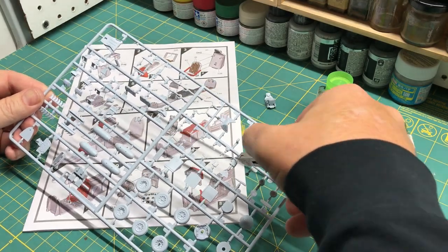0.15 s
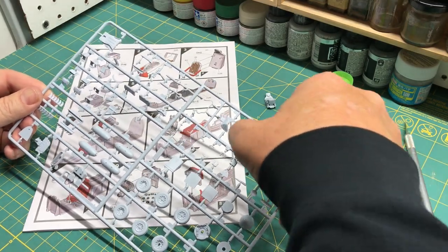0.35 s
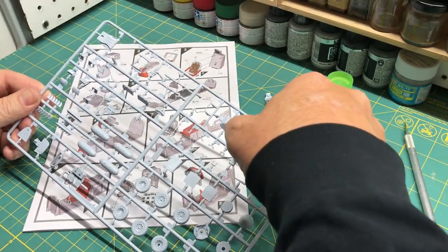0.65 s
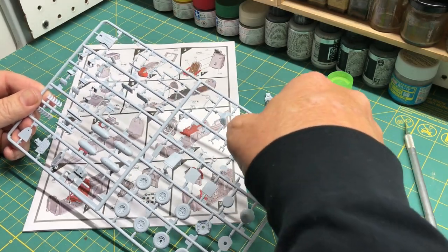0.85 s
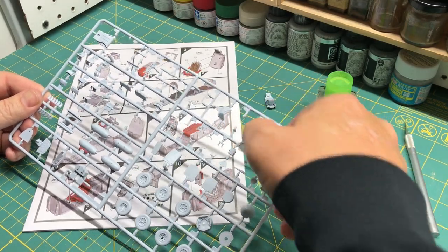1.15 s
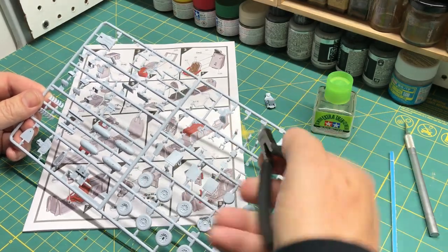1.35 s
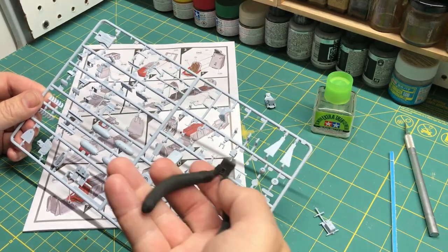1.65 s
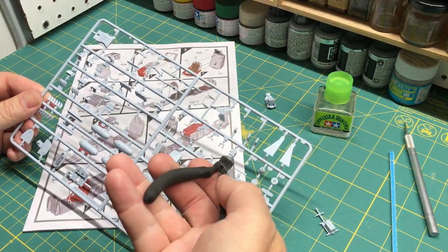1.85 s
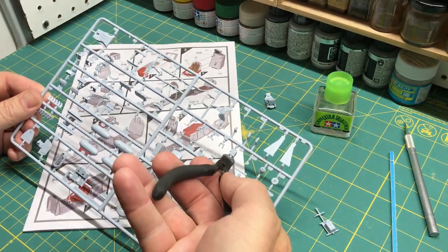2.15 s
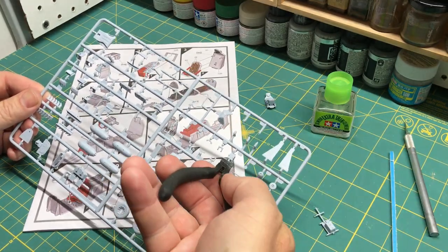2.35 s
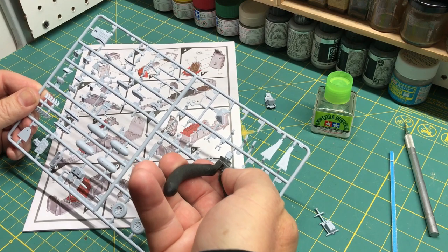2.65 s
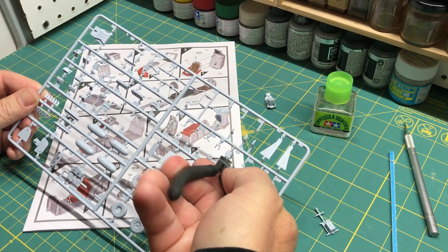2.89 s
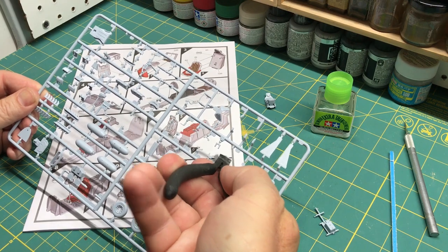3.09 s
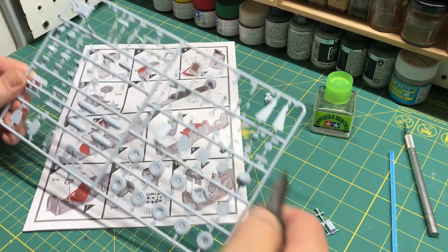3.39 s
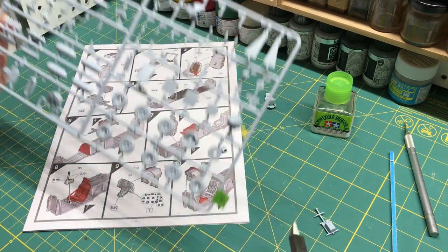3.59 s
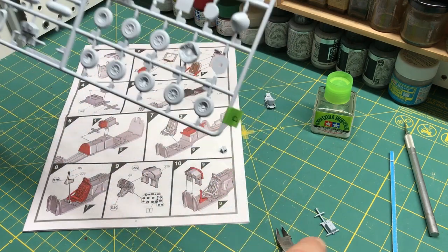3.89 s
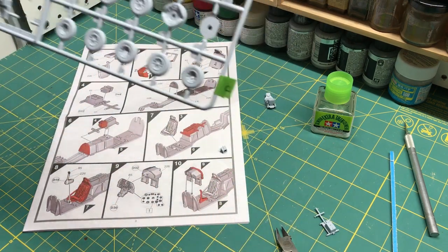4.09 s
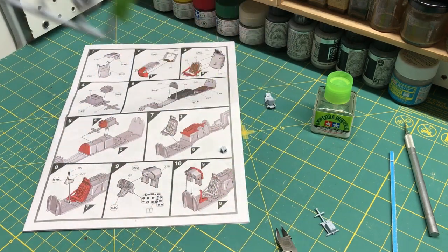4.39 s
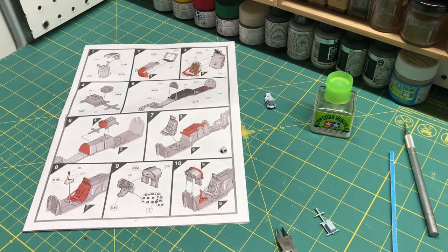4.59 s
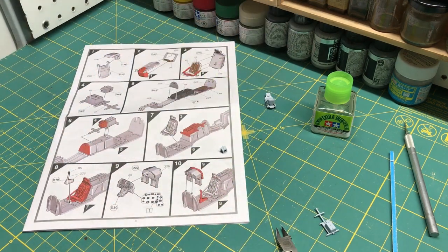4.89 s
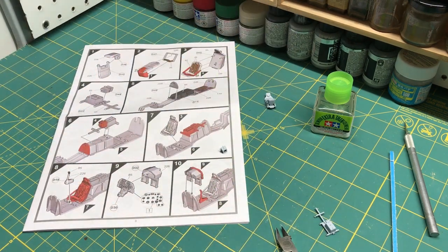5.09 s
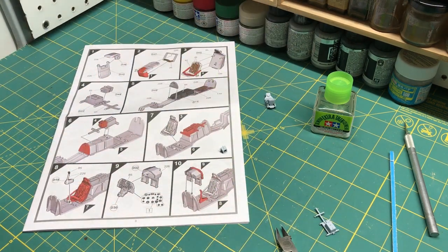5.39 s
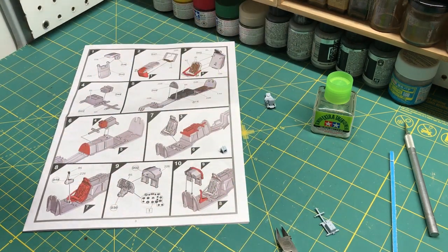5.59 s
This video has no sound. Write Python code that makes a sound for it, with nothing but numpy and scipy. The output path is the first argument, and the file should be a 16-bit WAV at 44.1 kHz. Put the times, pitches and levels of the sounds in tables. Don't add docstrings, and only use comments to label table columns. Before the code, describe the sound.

A quiet indoor hobby desk, heard close with short, dry room reflections. Throughout, a very low hum near 58 Hz swells and sinks every 2.5 seconds, weakest around 1.7 and 4.2, under soft air noise and a deep room boom. A faint slide opens. At 0.85 cutters snap plastic with a bright, ringing crack. Small taps at 1.25 lead into soft sleeve and finger rustles until 1.8, with tiny ticks near 1.9 and 2.2 and a light scrape at 2.4. A second sharp snip comes at 3.0, a duller one at 3.1, then a flurry of clicks and rubbing until 3.4. From 3.65 the tool touches down and scrapes; at 3.92 it lands with a hard, loud double knock, woody and briefly ringing, with tiny bounces until 4.0. Faint ticks follow at 4.4, 4.8 and 5.1, then soft brushes and clicks around 5.25-5.45. Treble occasionally drops out momentarily with faint watery tones.

```python
import sys
import numpy as np
from scipy import signal
from scipy.fft import rfft, irfft
from scipy.io import wavfile
from scipy.ndimage import uniform_filter1d

SR = 44100
rng = np.random.default_rng(int(sys.argv[2]) if len(sys.argv) > 2 else 0)


def file_out(sig):
    cols = np.atleast_2d(sig).T
    lim = np.clip(cols, -1, 1)
    pcm = np.round(lim * 32767).astype(np.int16)
    wavfile.write(sys.argv[1], SR, pcm)


def magnitude_from_level(level_db):
    exponent = np.asarray(level_db, float) / 20
    return 10 ** exponent


N = 253134


def read(points, hz):
    f, value = np.transpose(points)
    return np.interp(np.log(hz + 1), np.log(f + 1), value)


def evened(x):
    return x / np.sqrt(np.mean(x ** 2) + 1e-20)


def peaked(x):
    return x / np.max(abs(x))


def add(mix, s, sound):
    part = mix[round(s * SR):][:len(sound)]
    part += sound[:len(part)]


def coloured(x, spectrum):
    hz = np.fft.rfftfreq(len(x), 1 / SR)
    shaped = rfft(x) * magnitude_from_level(read(spectrum, hz)) * (hz < spectrum[-1][0])
    return evened(irfft(shaped, len(x)))


def resonate(x, hz, width):
    turn = np.exp(2j * np.pi * np.cumsum(hz * np.ones(len(x))) / SR)
    r = np.exp(-np.pi * width / SR)
    return 2 * (turn * signal.lfilter([1 - r], [1, -r], x / turn)).real


def highpass(order, hz):
    return signal.butter(N=order, Wn=hz, btype="high", fs=SR, output="sos")


def crack(t60, rise_s, low_hz):
    t = np.arange(4000) / SR
    rise = (1 - np.exp(-t / rise_s)) ** 2
    burst = rng.standard_normal(len(t)) * rise * magnitude_from_level(-60 * t / t60)
    return signal.sosfilt(highpass(2, low_hz), burst)


# frequency in Hz, level in dB per Hz.
ROOM_AIR = [(22, -40), (33, -25.5), (44, -12.5), (65, -4), (87, -11), (131, -14), (190, -22.5),
            (350, -28.5), (1150, -44.5), (3000, -49.5), (8000, -53.5), (16500, -51)]
AIR_DB = -55
HUM_HZ, HUM_DB = 58.52, -49
BEAT_S, CANCEL_S, LEFT_OVER = 2.5, 1.69, 0.09
BOOM_HZ, BOOM_WIDTH_HZ, BOOM_DB = 52.9, 3, -57


def room_tone():
    t = np.arange(N) / SR
    beat = np.pi * (t - CANCEL_S) / BEAT_S
    turn = 2 * np.pi * HUM_HZ * t
    tones = np.sin(beat) * np.sin(turn) + LEFT_OVER * np.cos(beat) * np.cos(turn)
    hum = np.sqrt(2) * magnitude_from_level(HUM_DB) * tones
    no_hum = [(f, level - 4.8 * (45 < f < 72)) for f, level in ROOM_AIR]
    air = magnitude_from_level(AIR_DB) * coloured(rng.standard_normal(N), no_hum)
    boom = resonate(rng.standard_normal(N), BOOM_HZ, BOOM_WIDTH_HZ)
    boom = resonate(boom, BOOM_HZ, 3 * BOOM_WIDTH_HZ)
    return hum + air + magnitude_from_level(BOOM_DB) * evened(boom)


# frequency in Hz, 60 dB decay time in seconds.
WALL_DECAY = [(300, 0.21), (1500, 0.14), (6000, 0.1), (15000, .09)]


def walls(x):
    hz, t, z = signal.stft(rng.standard_normal(SR // 2), SR, nperseg=128)
    decay = magnitude_from_level(-60 * t / read(WALL_DECAY, hz)[:, None])
    tail = signal.istft(z * decay, SR, nperseg=128)[1]
    tail *= np.arange(len(tail)) > .002 * SR
    return signal.fftconvolve(x, tail / np.linalg.norm(tail))[:N]


# frequency in Hz, level in dB per Hz.
CLOTH_HISS = [(1200, -20), (2200, -3.5), (4000, -2.5), (8000, -2), (14000, -1.5), (16500, 2.5)]
# frequency in Hz, level in dB per Hz.
SKIN_SCRAPE = [(250, -28.5), (500, -2), (1000, -4), (2000, -11), (4000, -22)]


def rub_noises():
    uneven = rng.standard_normal(N) * magnitude_from_level(1.2 * rng.exponential(1, N))
    hz, t, z = signal.stft(uneven, SR, nperseg=256)
    patches = uniform_filter1d(rng.standard_normal(z.shape), size=3, axis=0)
    patches = evened(uniform_filter1d(patches, size=9, axis=1))
    streaky = signal.istft(z * magnitude_from_level(3.6 * patches), SR, nperseg=256)[1][:N]
    catches = (rng.random(N) < 4000 / SR) * rng.standard_normal(N)
    return coloured(streaky, CLOTH_HISS), coloured(catches, SKIN_SCRAPE)


def rub(noises, s, u, hiss_db, scrape_db, ring_hz, share):
    at = round(s * SR) + np.arange(len(u))
    fine, coarse = [noise[at] for noise in noises]
    ring = resonate(coarse, ring_hz, 160) + .4 * resonate(fine, 2.4 * ring_hz, 300)
    scrape = share * evened(ring) + (1 - share) * coarse
    return (magnitude_from_level(hiss_db) * fine + magnitude_from_level(scrape_db) * scrape) * signal.windows.tukey(len(at), .08)


# middle in seconds, length in seconds, hiss in dB, scrape in dB, scrape ring in Hz.
BRUSHES = [(0.95, 0.078, -82, -68, 700), (1.426, .18, -73, -80, 750), (1.578, 0.19, -71.5, -84, 820),
           (1.747, 0.11, -75, -81, 700), (3.176, .035, -66, -72, 700), (3.235, .055, -72, -65, 696),
           (3.309, 0.094, -75, -66.5, 1010), (3.405, .14, -69.5, -75.5, 1040),
           (3.556, 0.13, -73.5, -80, 800), (3.726, 0.12, -75, -65.5, 1170), (2.428, 0.094, -84, -69.5, 597),
           (.2, 0.18, -90, -73, 1340), (1.256, 0.065, -85, -76, 690), (3.84, 0.081, -70, -67, 1390),
           (5.247, 0.19, -68, -78.5, 843), (5.385, 0.12, -69, -77.5, 836)]
BRUSH_EDGE_DB, BRUSH_RING = -13, 0.3


def brushes(noises):
    out = np.zeros(N)
    for middle, length, hiss_db, scrape_db, ring_hz in BRUSHES:
        s = middle - length / 2
        u = np.linspace(0, 1, round(length * SR))
        swell = magnitude_from_level(BRUSH_EDGE_DB * (2 * u - 1) ** 2)
        add(out, s, swell * rub(noises, s, u, hiss_db, scrape_db, ring_hz, BRUSH_RING))
    return out


# start in seconds, length in seconds, hiss in dB, scrape in dB, scrape ring in Hz.
SLIDES = [(0, 0.16, -93, -61.5, 1330), (.89, .04, -79, -76, 690), (2.374, 0.13, -85, -60, 675),
          (3.13, 0.021, -72, -76, 750), (3.185, .02, -69, -60, 700), (3.659, 0.084, -61, -50, 1050),
          (3.74, .03, -64, -52, 1210), (3.754, .095, -60, -51, 1340), (3.856, .062, -60, -54.5, 800),
          (4.0, 0.16, -85, -64.5, 880), (5.086, .062, -65, -73, 970)]
SLIDE_RISE_S, HISS_FADE_DB, SCRAPE_FADE_DB, SLIDE_RING = .004, -6, -14, .5


def slides(noises):
    out = np.zeros(N)
    for s, length, hiss_db, scrape_db, ring_hz in SLIDES:
        u = np.linspace(0, 1, round(length * SR))
        rise = np.minimum(u * length / SLIDE_RISE_S, 1)
        hiss_db = hiss_db + HISS_FADE_DB * u
        scrape_db = scrape_db + SCRAPE_FADE_DB * np.sqrt(u)
        add(out, s, rise * rub(noises, s, u, hiss_db, scrape_db, ring_hz, SLIDE_RING))
    return out


# start in seconds, peak in dB, mode in Hz, 60 dB decay time in seconds.
TAPS = [(.85, -53.5, 355, 0.21), (1.232, -56.5, 1590, 0.073), (1.238, -57.5, 1010, 0.038),
        (1.246, -57, 650, 0.17), (2.212, -63, 900, 0.034), (2.387, -52, 674, 0.037),
        (2.403, -53.5, 1020, 0.06), (3.012, -52, 595, 0.072), (3.186, -52, 677, 0.022),
        (3.278, -74, 1580, .12), (3.319, -56, 1530, 0.074), (3.51, -61.5, 1190, 0.058),
        (3.69, -60, 2220, .1), (3.78, -54, 3600, .08), (3.9323, -30, 3220, 0.019),
        (3.942, -43, 5430, 0.079), (4.794, -51, 5250, .04), (5.44, -58, 1880, 0.053),
        (5.452, -61, 3520, 0.057)]


def taps():
    out = np.zeros(N)
    for s, db, hz, t60 in TAPS:
        width = 120 + hz / 8
        ring = resonate(crack(t60, .0008, 300), hz, width)
        add(out, s, magnitude_from_level(db) * peaked(resonate(ring, hz, 2 * width)))
    return out


# start in seconds, peak in dB, ring in Hz, ring share from 0 to 1, 60 dB decay time in seconds.
TICKS = [(1.2395, -53, 2550, 0.43, 0.053), (1.8878, -57, 4060, 0.6, 0.025), (1.962, -64, 2500, 0.9, 0.025),
         (2.208, -63, 2990, 0.7, 0.025), (3.1624, -58, 3620, 0.8, 0.025), (3.171, -50, 4240, 0.6, 0.018),
         (3.1836, -43, 4100, 1, 0.014), (3.2208, -48, 4200, 0.5, 0.0069), (3.237, -44, 3900, 0.55, 0.0057),
         (3.25, -56, 3020, 0.7, 0.016), (3.275, -56, 2610, 0.3, 0.028), (3.309, -53, 3280, 0.7, 0.012),
         (3.316, -56, 3500, 0.55, 0.035), (3.366, -59, 3320, 0.47, 0.025), (3.5343, -68, 2880, 0, 0.019),
         (4.417, -63.5, 2830, 0.6, 0.054), (4.792, -53.5, 5200, 0.95, 0.03),
         (5.0872, -52, 6580, 0.2, 0.039), (5.1294, -61.5, 2820, 0.4, 0.03),
         (5.38, -54.5, 3110, 0.26, 0.025), (5.439, -47, 4530, 0.37, 0.028), (5.4463, -47, 3780, 0.3, 0.026)]


def ticks():
    out = np.zeros(N)
    for s, db, hz, share, t60 in TICKS:
        burst = crack(t60, 0.00088, 1450)
        share = np.clip(share, 0, 1)
        tick = share * evened(resonate(burst, hz, 820)) + (1 - share) * evened(burst)
        add(out, s - .0005, magnitude_from_level(db) * peaked(tick))
    return out


# start in seconds, peak in dB, tick in dB, hardness in Hz, ring length as a factor.
KNOCKS = [
    (3.6552, -38.5, -48, 2500, 0.53),
    (3.7422, -45, -53.5, 2500, 0.43),
    (3.851, -24, -35, 1300, 0.93),
    (3.9215, -7, -25, 1800, 0.66),
    (3.9335, -8, -22.5, 1800, 0.38),
    (3.9446, -22, -47, 800, 0.29),
    (3.9542, -23.5, -42, 2200, 0.21),
    (3.9745, -21.5, -34.5, 1800, 0.53),
]
# frequency in Hz, level in dB, 60 dB decay time in seconds.
DESK_MODES = [(110, -12.5, 0.13), (181.5, -15.5, 0.12), (233, -11, .18), (300, -2.5, 0.071),
              (340, -9.5, 0.053), (391.7, -2, 0.13), (508, -15.5, .08), (636, -11.5, .07),
              (672, -2.5, 0.046), (784, -4.5, 0.044), (933, -4, 0.054), (1097, -10.5, .04),
              (1185, -5.5, 0.038), (1340, -5.5, 0.018), (1608, -7.5, 0.033), (1930, -15.5, 0.049),
              (2400, -21.5, 0.0427)]


def knocks():
    out = np.zeros(N)
    t = np.arange(9000) / SR
    spots = rng.standard_normal((len(KNOCKS), len(DESK_MODES)))
    for (s, db, tick_db, hard_hz, ring), spot in zip(KNOCKS, spots):
        modes = np.zeros(len(t))
        for (hz, level, t60), chance in zip(DESK_MODES, spot):
            late = t - .002 * np.sqrt(1000 / hz)
            decay = magnitude_from_level(level + 2.4 * chance - 60 * t / (ring * t60))
            softness = 1 + (hz / hard_hz) ** 2
            rise = 1 - np.exp(-(t * hz / .8) ** 2)
            modes -= decay / softness * rise * np.cos(2 * np.pi * hz * late)
        add(out, s, magnitude_from_level(db) * peaked(modes))
        add(out, s, magnitude_from_level(tick_db) * peaked(crack(0.042, .0002, 1500)))
    return out


# start in seconds, peak in dB, body knock in dB,
# knock in Hz, 60 dB decay time in seconds.
SNAPS = [
    (0.8478, -18.5, -54, 785, 0.023),
    (3.0066, -22.5, -49, 1040, 0.017),
    (3.1083, -30.5, -38.5, 626, .012),
]
# frequency in Hz, width in Hz, level in dB.
SNAP_RINGS = [
    [(3520, 44, -1), (5000, 45, -5), (7300, 120, -21), (8000, 31, 8), (9550, 190, 9), (11400, 33, -7),
     (12960, 220, 5.5), (16100, 150, -11)],
    [(3050, 98, -17), (3190, 100, -8), (4700, 99, 4), (5470, 140, 0), (7700, 120, -11), (8730, 93, -19),
     (14100, 230, 4.5), (15700, 240, -14)],
    [(1850, 140, -7.5), (3960, 100, 22.5), (4520, 110, 3), (5370, 88, -60), (6820, 110, -45),
     (13300, 250, -18), (14000, 80, -12.5)],
]


def snaps():
    out = np.zeros(N)
    damping, bare = 5.5, .5
    for (s, db, knock_db, knock_hz, t60), rings in zip(SNAPS, SNAP_RINGS):
        burst = crack(t60, 0.00033, 1900)
        ring = sum(magnitude_from_level(level) * evened(resonate(burst, hz, damping * width)) for hz, width, level in rings)
        snap = evened(ring) + bare * evened(burst)
        knock = resonate(crack(0.036, 0.003, 130), knock_hz, 370)
        knock = resonate(knock, knock_hz, 760)
        add(out, s - .0004, magnitude_from_level(db) * peaked(snap) + magnitude_from_level(knock_db) * peaked(knock))
    return out


def scene():
    bright = snaps() + ticks()
    dull = knocks() + taps()
    reflections = magnitude_from_level(-13) * walls(bright) + magnitude_from_level(-12.5) * walls(dull)
    noises = rub_noises()
    rubs = slides(noises) + brushes(noises)
    return (bright + dull + reflections + rubs + room_tone())[None]


# centre in seconds, empty above this Hz, two stray tones
# in Hz.
DROPOUTS = [(0.369, 2100, 3800, 11400), (0.4142, 1960, 1700, 1360), (.4361, 1090, 5200, 2000),
            (0.519, 1290, 3260, 1080), (.6473, 1270, 3630, 1090), (0.8216, 1500, 4700, 5640),
            (1.4998, 940, 890, 690), (1.672, 2040, 9800, 1850), (2.3535, 1120, 14300, 870),
            (2.6515, 1630, 3360, 1210), (2.7384, 1400, 2700, 2200), (3.614, 2130, 1910, 1310),
            (3.83, 1600, 6400, 2320), (4.2104, 600, 2800, 2220), (4.36, 1003, 3550, 1950),
            (4.5515, 690, 1302, 750), (5.001, 980, 5470, 2400), (5.4913, 1300, 1017, 800)]
FRAME_S = 1024 / 48000


def dropouts(heard):
    x = heard.copy()
    u = np.linspace(-1, 1, round(2 * FRAME_S * SR))
    centres = [row[0] for row in DROPOUTS]
    for s, edge_hz, *tones in DROPOUTS:
        near = np.arange(N)[round((s - FRAME_S) * SR) - 400:][:len(u) + 800]
        weights = [np.cos(np.pi / 2 * np.clip((near / SR - centre) / FRAME_S, -1, 1)) ** 2
                   for centre in centres + [s]]
        lost = sum(weights[:-1])
        kept = np.sqrt(np.clip(1 - 1.04 * lost, 0, 1))
        cut = (1 - kept) * weights[-1] / (lost + 1e-9)
        treble = signal.sosfiltfilt(highpass(6, edge_hz), heard[near])
        add(x, near[0] / SR, -cut * treble)
        level = magnitude_from_level(-7.5) * np.std(treble[:len(u)])
        for hz in tones:
            tone = np.cos(np.pi * u / 2) * np.sin(2 * np.pi * hz * u * FRAME_S)
            add(x, s - FRAME_S, level * tone)
    return x


# frequency in Hz, gain in dB.
MIC = [(20, -14), (45, -1), (4300, 1.5), (4900, -0.5), (5600, 0.5), (7000, 0.5), (7700, -2.5), (8600, 1),
       (10500, -4.5), (11800, 0.5), (15300, -3.5), (16000, -9.5), (16900, -40.5)]


def microphone(x):
    return irfft(rfft(x) * magnitude_from_level(read(MIC, np.fft.rfftfreq(N, 1 / SR))), N)


def roll_off(x):
    return signal.sosfilt(signal.butter(12, 16830, fs=SR, output="sos"), x)


def record(dry):
    mix = dropouts(microphone(dry[0]))[None]
    return roll_off(mix)


dry = scene()
out = record(dry)
file_out(out)
```